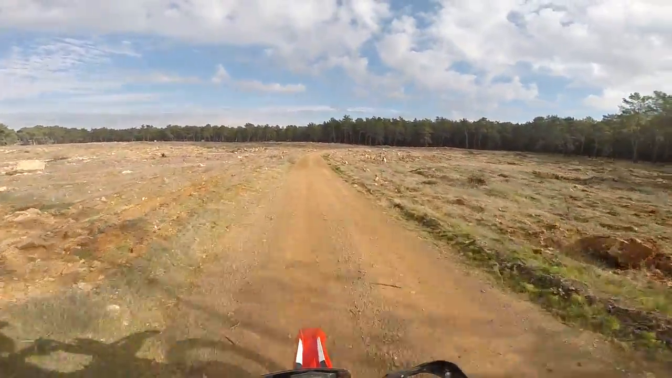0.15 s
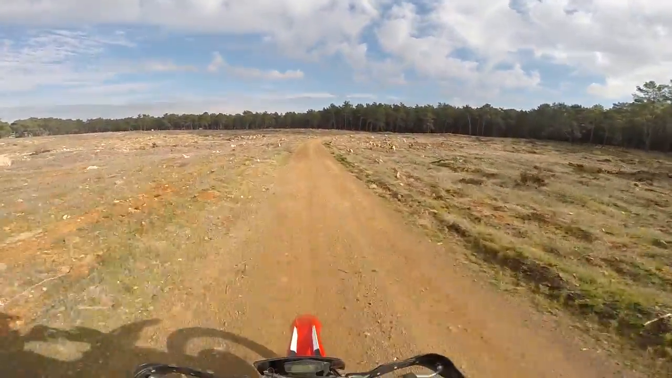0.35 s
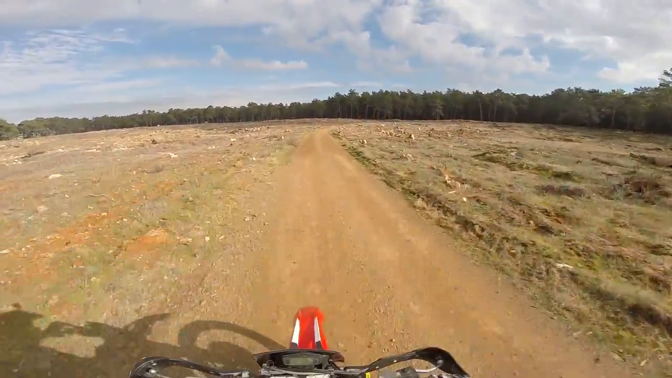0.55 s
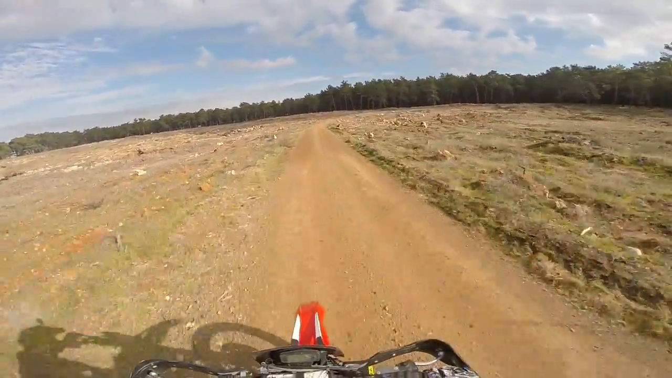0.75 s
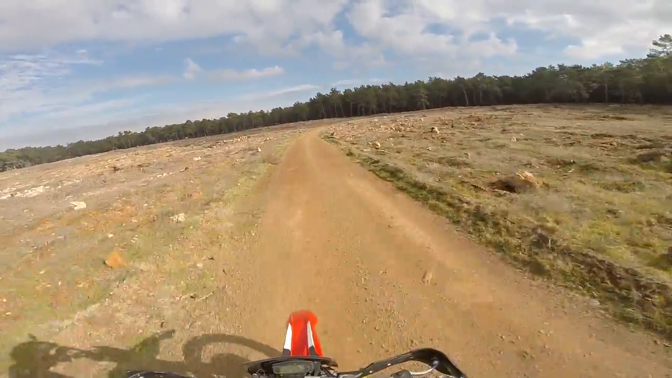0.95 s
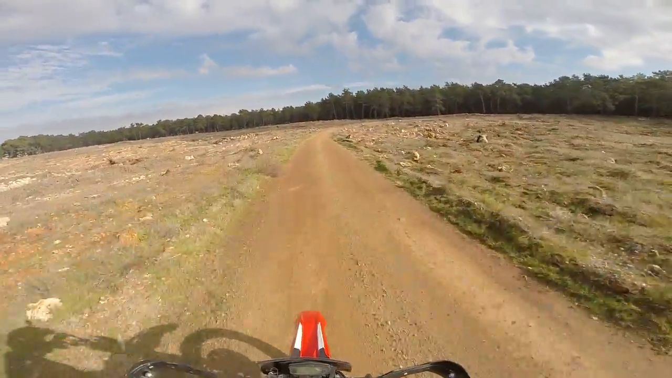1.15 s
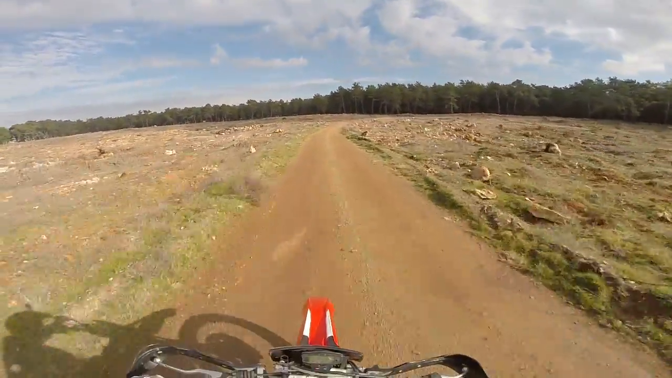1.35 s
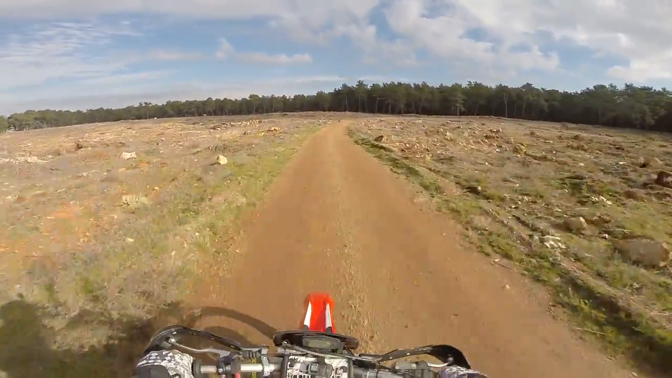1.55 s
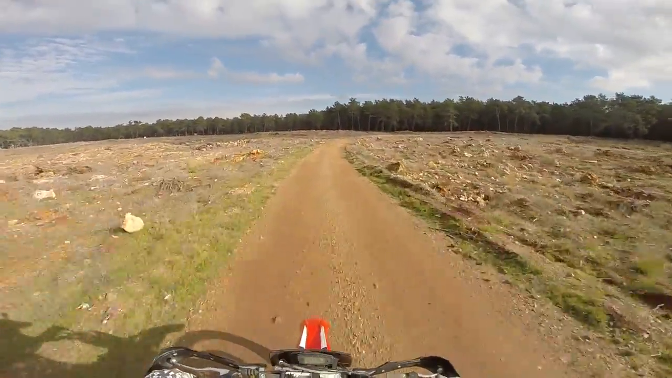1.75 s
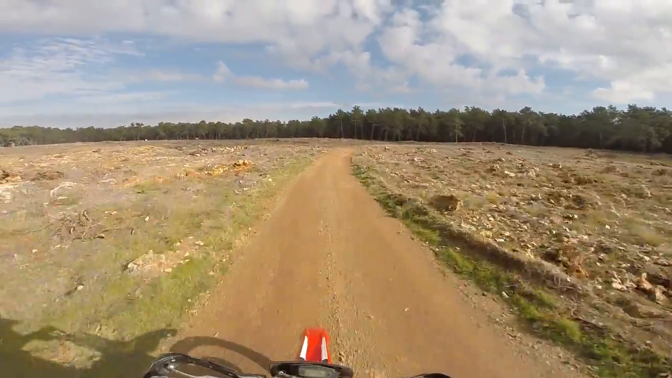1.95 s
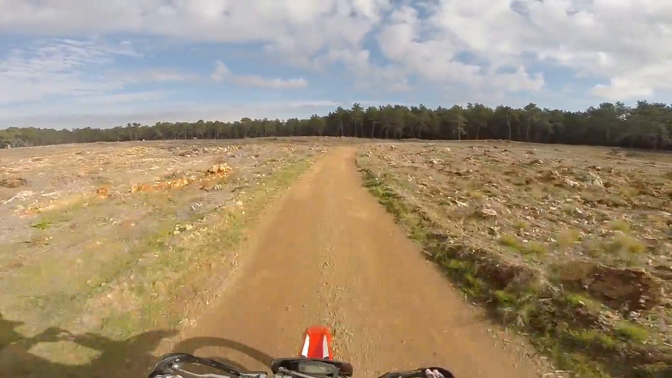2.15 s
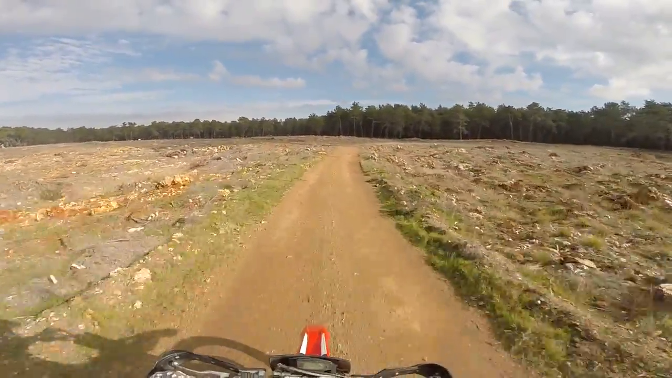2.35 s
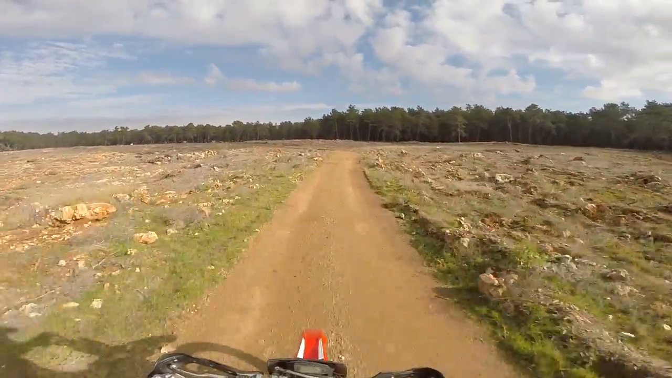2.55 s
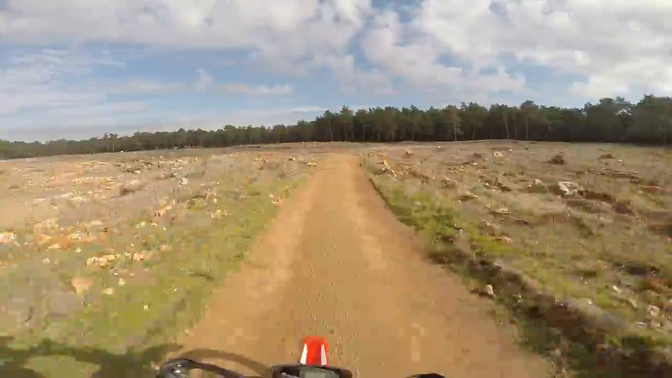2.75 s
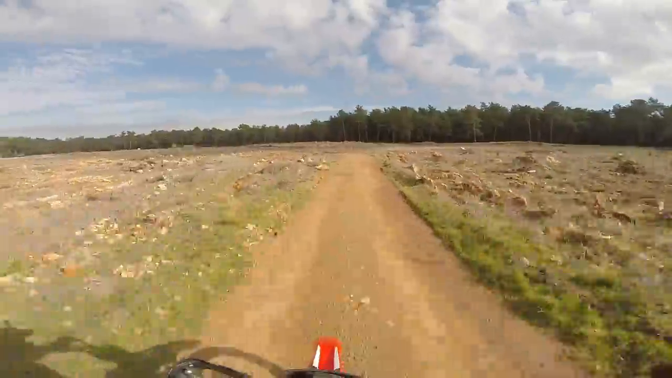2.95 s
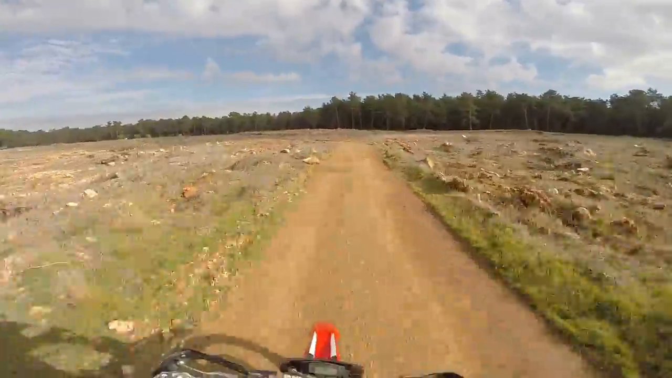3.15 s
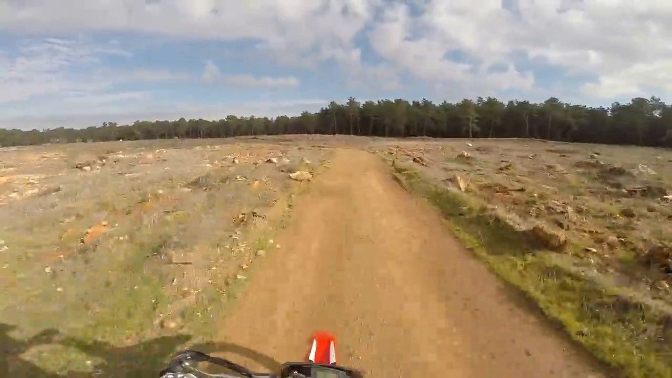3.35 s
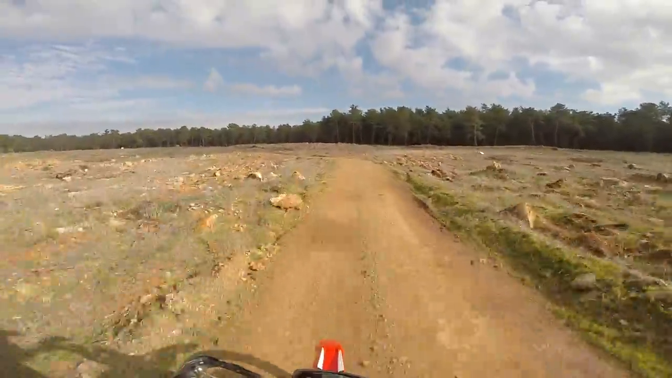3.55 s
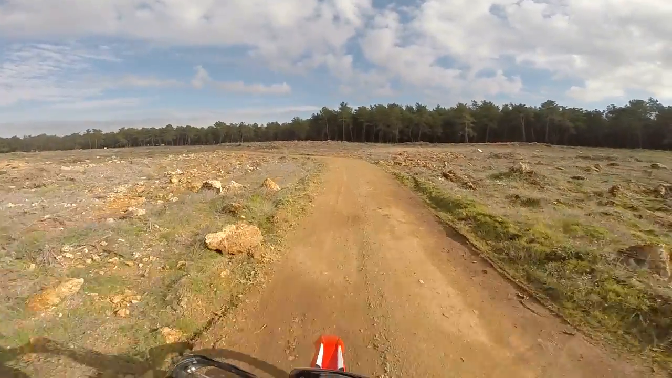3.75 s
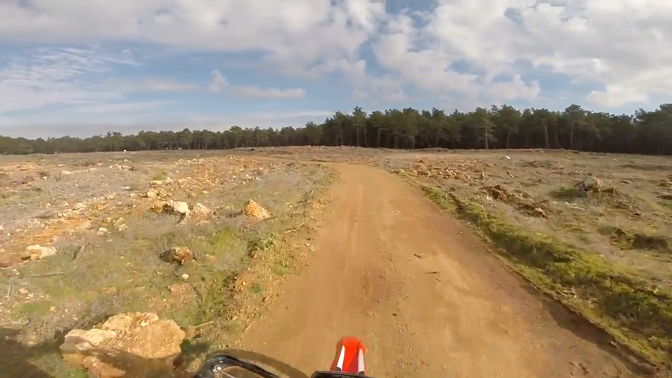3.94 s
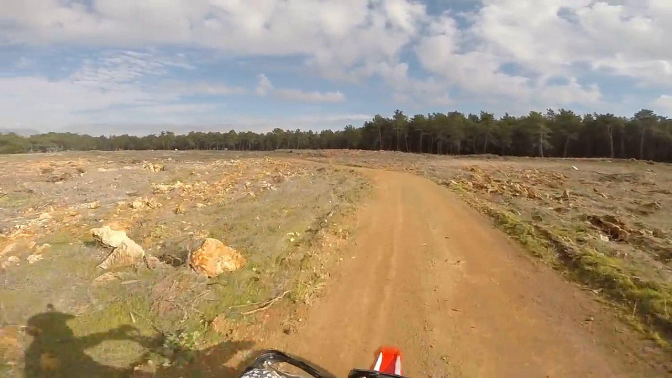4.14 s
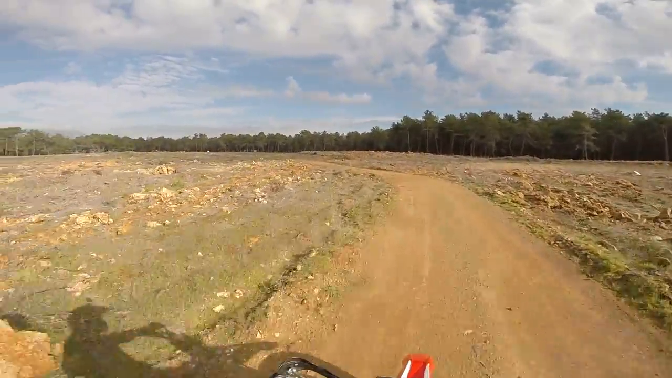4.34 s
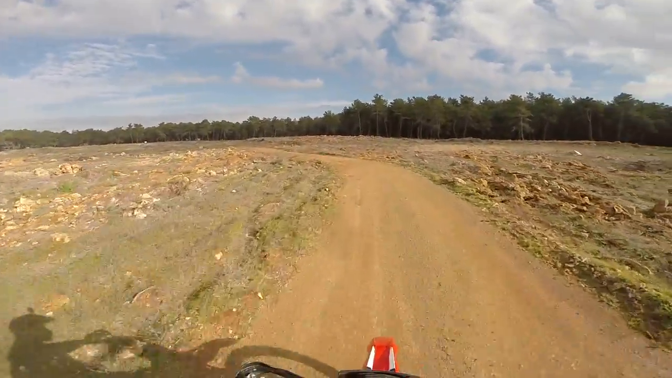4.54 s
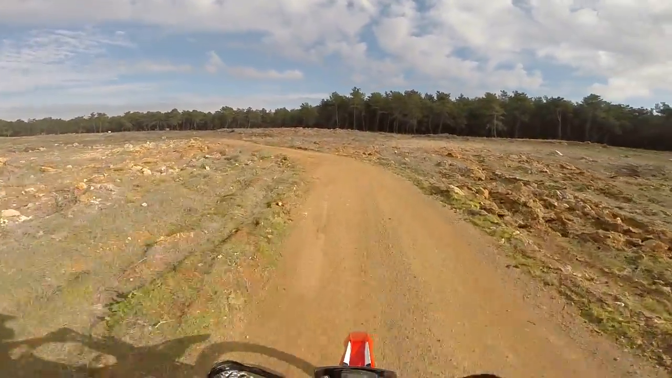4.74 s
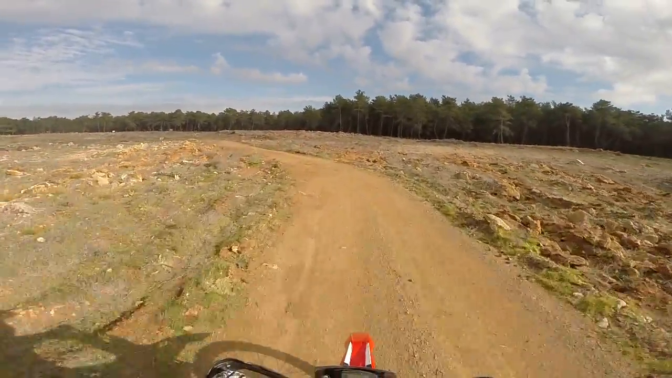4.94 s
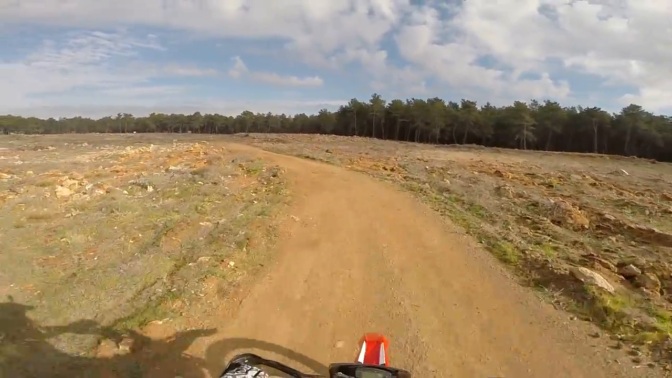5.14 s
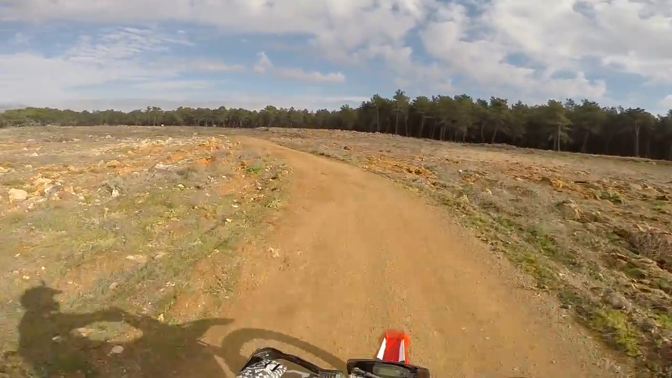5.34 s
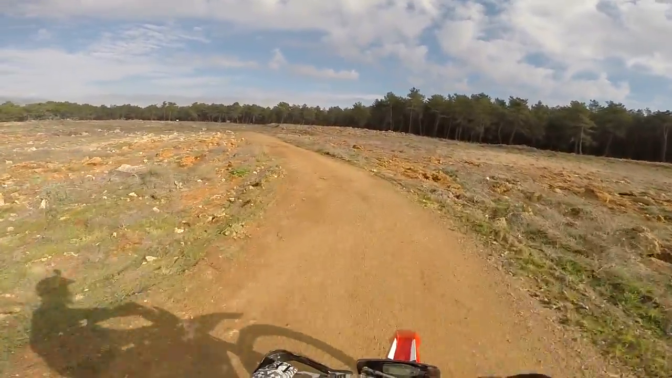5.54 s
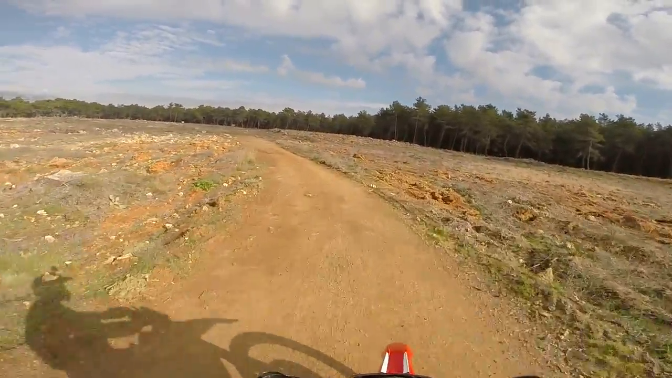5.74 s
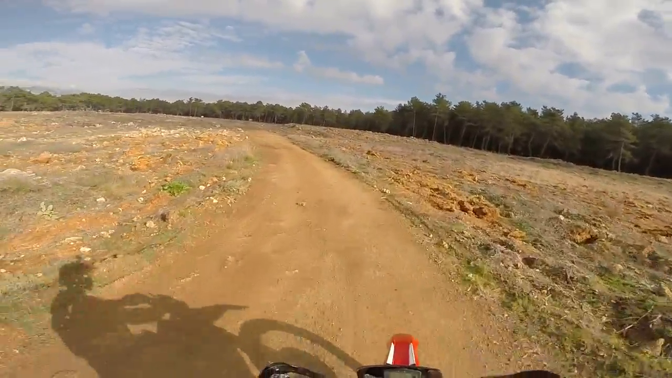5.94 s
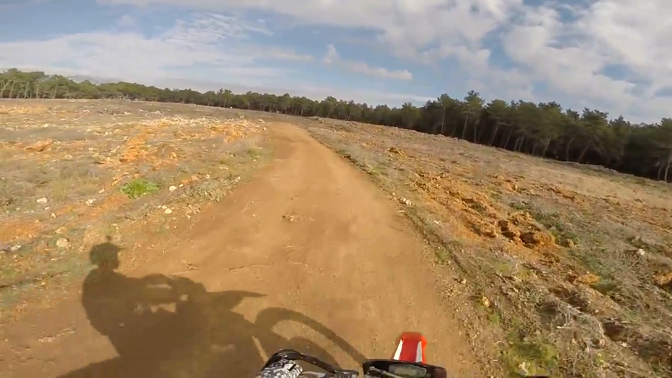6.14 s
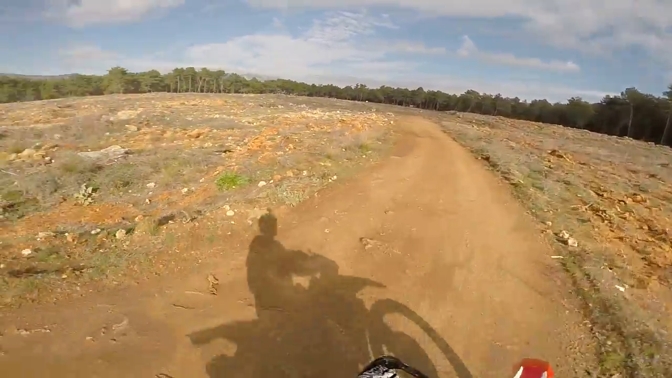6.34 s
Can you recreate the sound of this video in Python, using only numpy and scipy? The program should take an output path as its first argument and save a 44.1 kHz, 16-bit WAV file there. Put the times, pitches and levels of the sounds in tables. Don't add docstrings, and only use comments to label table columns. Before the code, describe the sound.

Wind roars against a helmet microphone on a dirt bike crossing an open trail, a dense midrange rush with fine hiss and unsteady low buffeting. From 0 to 1.5 seconds a low, throaty engine growl climbs in pitch beneath it. At 0.5 a hard grain cracks sharply on the case and the level briefly dips, then recovers; the wind is strongest around 1.4. A soft knock comes near 1.7 as the engine gives way to a coasting hum that slides steadily lower. Tiny shrill whistles flicker from 2.3 to 2.9, with a booming shake near 3.0. A rough buzz rises and drops between 3.2 and 3.8. Deep, soft jolts thud from 3.7 to 4.4. The wind then thins markedly, leaving the low hum and faint rattles more exposed, with tiny high metallic chain chirps from 6.0 to 6.4.

```python
import sys
import numpy as np
from scipy import signal
from scipy.fft import rfft, irfft, next_fast_len
from scipy.io import wavfile
from scipy.ndimage import uniform_filter1d

SR = 44100
rng = np.random.default_rng(int(sys.argv[2]) if len(sys.argv) > 2 else 0)


def log_audio(samples):
    frames = np.atleast_2d(samples).T
    limited = np.clip(frames, -1, 1)
    pcm = np.round(limited * 32767).astype(np.int16)
    wavfile.write(sys.argv[1], SR, pcm)


def boost(x):
    u = np.asarray(x, float) / 20
    return 10 ** u


N = 286204

# start_s, flow_db, turn_db (head turn: plus feeds the lower resonances, minus the upper)
AIRFLOW = [(0, -24.5, -1), (.16, -22, -4.5), (.45, -19.5, 0.5), (.9, -21.5, -0.5), (1.41, -17.5, -3),
           (1.66, -22, -3), (2.16, -21, -8), (2.72, -20, -5), (3.02, -24, -8), (3.2, -22, -2.5),
           (3.7, -25, -5.5), (4.22, -26.5, -11.5), (4.55, -28, -6), (4.67, -29, -9), (4.92, -34.5, -7.5),
           (5.19, -33.5, -4.5), (5.87, -37, 2.5), (6.49, -44, 5)]


def rms_one(x):
    return x / np.sqrt(np.mean(x ** 2) + 1e-20)


def in_time(rows):
    s, *columns = np.transpose(rows)
    return [np.interp(np.arange(N) / SR, s, c) for c in columns]


def swells(rows):
    t = np.arange(N) / SR
    return sum(db * np.exp(-((t - s) / half_s) ** 2) for s, half_s, db in rows)


def follow(mean_db, db_per_db):
    flow_db = in_time(AIRFLOW)[0]
    mean_flow_db = -25
    return mean_db + db_per_db * (flow_db - mean_flow_db)


def drift(rate_hz):
    r = np.exp(-40 * np.pi * rate_hz / SR)
    noise = rng.standard_normal(N // 20 + 2002)
    slow = signal.lfilter([1], [1, -2 * r, r * r], noise)[2000:]
    return np.interp(np.arange(N) / 20, np.arange(len(slow)), rms_one(slow))


def resonate(x, hz, width_hz):
    r = np.exp(-np.pi * width_hz / SR)
    zeros = [(1 - r * r) / 2, 0, (r * r - 1) / 2]
    poles = [1, -2 * r * np.cos(2 * np.pi * hz / SR), r * r]
    return signal.lfilter(zeros, poles, x)


def coloured(spectrum, slope_db):
    size = next_fast_len(N)
    octave = np.log2(np.arange(size // 2 + 1) * SR / size + 1)
    hz, db = np.transpose(spectrum)
    at = np.log2(hz)
    outside = np.maximum(at[0] - octave, 0) + np.maximum(octave - at[-1], 0)
    gain = boost(np.interp(octave, at, db) - slope_db * outside)
    return rms_one(irfft(rfft(rng.standard_normal(size)) * gain, size)[:N])


def window(start_s, stop_s, fade_s):
    t = np.arange(N) / SR
    return np.clip(np.minimum(t - start_s, stop_s - t) / fade_s, 0, 1)


def tone(rows, fade_s, wobble):
    hz, db = in_time(rows)
    turns = np.cumsum(hz * (1 + wobble * drift(50.5))) / SR
    return window(rows[0][0], rows[-1][0], fade_s) * boost(db + 3.5) * np.sin(2 * np.pi * turns)


def stack(speed, level, orders, fade_s, breath_db):
    (rate,), (db,) = in_time(speed), in_time(level)
    angle = 2 * np.pi * np.cumsum(rate) / SR
    lines = 0
    for k, order_db in orders:
        phase = rng.uniform(0, 2 * np.pi)
        lines = lines + boost(order_db + breath_db * drift(5.4)) * np.sin(round(k) * angle + phase)
    return window(speed[0][0] - fade_s, speed[-1][0] + fade_s, fade_s) * boost(db + 3) * lines


def burst(events, column, t60_s):
    out, t = np.zeros(N), np.arange(int(.05 * SR)) / SR
    for row in events:
        at = round(row[0] * SR)
        noise = rng.standard_normal(len(t))
        out[at:at + len(t)] += (boost(row[column] - 60 * t / t60_s) * noise)[:N - at]
    return out


def wind():
    # pitch_hz, width_hz, level_db, lower_share (0-1), brightness_share (0-1)
    housing = [(1541, 229, 1, 0.99, 0), (1750, 480, -5.5, 0.48, 0.08), (2170, 450, -3, 0.67, 0),
               (2486, 196, 0, 0.36, 0), (2692, 207, 1, 0.33, 0), (3253, 290, -4, 0.14, 0.06),
               (3518, 353, 1.5, 0.42, 0.09), (4105, 99, -9, 0.06, 0.5), (4410, 350, -15.5, 0.1, 0.94),
               (5112, 230, -15, 0, 0.26), (5684, 920, -14.5, 0, 0.95), (6300, 360, -26, 0.1, 1)]
    # pitch_hz, level_db (per Hz)
    fine_hiss = [(6500, -6.5), (7500, 2), (8300, -1.5), (8900, -2.5), (9700, -4), (10500, -3),
                 (11500, -10.5), (12600, -19), (13600, -18), (15000, -11)]
    # start_s (centre), half_length_s, turn_db
    nods = [(.33, .04, 2), (3.42, 0.09, -4), (3.98, .08, 2), (4.38, .07, 0), (5.42, .1, 1), (5.74, .07, -1),
            (6.1, 0.054, -10)]
    # start_s (centre), half_length_s, level_db
    lulls = [(.6, .06, -1.5), (1.28, .06, -1), (3.6, .08, -0.5), (3.98, 0.027, -3.5), (4.38, 0.2, -2.5),
             (5.74, 0.082, -1), (6.37, .08, 0.5)]
    # start_s (centre), half_length_s, level_db
    gusts = [(1.15, 0.16, 0), (2.95, 0.22, 4), (3.62, 0.16, 3.5), (4.42, 0.19, 3)]
    flow_db, turn_db = in_time(AIRFLOW)
    flow_db, turn_db = flow_db + swells(lulls), turn_db + swells(nods)
    upper_db, lower_db = flow_db - turn_db / 2, flow_db + turn_db / 2
    fine_db = follow(mean_db=-45, db_per_db=1.275) + swells(gusts)
    gust, flutter = drift(11.5), drift(150)
    lower_tilt_db = lower_db - upper_db + 3
    brightness_db = fine_db - upper_db + 22
    roar = 0
    for hz, width_hz, db, low, bright in housing:
        eddies = rng.standard_normal(N)
        for _ in range(2):
            eddies = resonate(eddies, hz, 1.295 * width_hz)
        eddy_db = db + low * lower_tilt_db + bright * brightness_db + 0.57 * drift(10.5)
        roar = roar + boost(eddy_db) * eddies
    roar = boost(upper_db + 13.5 + 0.62 * gust + 0.6 * flutter) * roar
    hiss_db = fine_db + 0.17 * gust + 0.53 * flutter + 0.72 * drift(24)
    return roar + boost(hiss_db) * coloured(fine_hiss, slope_db=35)


def mount_boom():
    # pitch_hz, width_hz, level_db
    mount = [(172, 21, 1.5), (186.3, 6.8, -1.5)]
    # start_s (centre), half_length_s, level_db
    washboard = [(.12, 0.12, -4.5), (.3, 0.026, 4), (.5, 0.041, 7.5), (1.25, 0.068, -0.5), (1.58, 0.14, 7),
                 (2.3, 0.14, 3), (2.6, 0.048, 6), (2.81, 0.1, 5.5), (3.04, 0.081, 11), (3.65, 0.11, 8),
                 (4.4, 0.33, 0.5)]
    boom_db = follow(mean_db=-32, db_per_db=0.63) + swells(washboard)
    push = resonate(rng.standard_normal(N), 157.5, 61)
    boom = sum(boost(db) * resonate(push, hz, width_hz) for hz, width_hz, db in mount)
    return boost(boom_db + 2.0 + 1.25 * drift(8.2)) * rms_one(boom)


def buffeting():
    # pitch_hz, level_db (per Hz)
    buffet = [(8, -7), (13, -4.5), (24, -6), (42, -7), (58, -10)]
    # start_s (centre), half_length_s, level_db
    rocking = [(0, 0.14, 6), (.55, .15, -4), (1.76, .08, 2), (2.85, .1, 5.5), (4.1, .4, 2),
               (5.35, 0.29, -0.5), (6.4, 0.35, 1.5)]
    buffet_db = follow(mean_db=-35, db_per_db=0.29) + swells(rocking)
    return boost(buffet_db + 0.5) * coloured(buffet, slope_db=8.0)


def ground():
    # pitch_hz, level_db (per Hz)
    rolling = [(45, 3), (75, -7), (130, 11.5), (215, -31), (260, -1), (340, -7), (430, -4), (550, -8.5),
               (800, -5), (1000, -8), (1250, 2), (1400, -15)]
    db = follow(mean_db=-40, db_per_db=0.88)
    return boost(db + 3.0 + 0.67 * drift(17)) * coloured(rolling, slope_db=26)


def engine():
    # start_s, firing_hz
    firing = [(0, 45), (.15, 46.4), (.45, 47.4), (.9, 58.2), (1, 61.7), (1.07, 68.2), (1.25, 73.3),
              (1.45, 76.2), (1.56, 76.6)]
    # start_s, level_db
    firing_db = [(0, -40), (.45, -42), (.7, -39.5), (1.05, -39.5), (1.56, -45.5)]
    # multiple, slow_db, middle_db, fast_db (at the three speeds below)
    harmonics = [(1, -3, -3, -1), (2, 5, 4, 4), (3, 0, 3, 7), (4, -3, -6, -3), (5, -2, -1, -4),
                 (6, -1, -5, 0), (7, -16, -5, -8), (8, -10, -1, -6), (9, -11, -6, -6), (10, -11, -10, -7),
                 (11, -10, -10, -4), (12, -17, -12, -8), (13, -12, -4, -13), (14, -12, -9, -12),
                 (17, -8, -14, -16)]
    speeds = (46, 56, 74)
    rate, = in_time(firing)
    pulling = [(k, np.interp(rate, speeds, db)) for k, *db in harmonics]
    return stack(firing, firing_db, pulling, fade_s=0.019, breath_db=0.6)


def grit():
    # start_s, crack_db, tick_db, knock_db
    grains = [
        (.282, -45, -15, -40),
        (0.5136, 11, -4, -3),
        (1.2522, -45, -13, -40),
        (1.592, -36, -15, -40),
        (1.6748, -19, -19, -3.5),
    ]
    crack = burst(grains, column=1, t60_s=0.0059)
    bright = signal.sosfilt(signal.butter(2, [4900, 11000], "band", fs=SR, output="sos"), crack)
    ring = 1.6 * resonate(crack, 8900, 250)
    tick = burst(grains, column=2, t60_s=0.0029)
    tick = signal.sosfilt(signal.butter(2, 9000, "high", fs=SR, output="sos"), tick)
    knock = np.zeros(N)
    for start_s, _, _, knock_db in grains:
        knock[round(start_s * SR)] = boost(knock_db + 22.0)
    knock = signal.sosfilt(signal.butter(2, 3500, fs=SR, output="sos"), knock)
    dull = -.8 * resonate(knock, 750, 320) - 1.5 * resonate(knock, 1580, 350)
    dull += 2.5 * resonate(knock, 2660, 400) - 0.44 * resonate(knock, 2900, 400)
    return bright + ring + tick + dull


def ruts():
    # start_s, sway_db, shudder_db
    jolts = [(.36, -28, -30), (1.2, -33, -18), (1.72, -16.5, -21), (2.8, -31, -22), (3.03, -23, -34),
             (3.7, -20, -14), (3.88, -11.5, -24), (4.048, -13.5, -8), (4.351, -14.5, -24), (5.67, -27, -15),
             (6.28, -31, -36)]
    out = np.zeros(N)
    for s, sway_db, shudder_db in jolts:
        t = np.maximum(np.arange(N) / SR - s, 0)
        sway = (t / 0.11) * np.exp(1 - t / 0.056) * np.sin(2 * np.pi * 14 * t)
        shudder = (t / 0.077) * np.exp(1 - t / 0.019) * np.sin(2 * np.pi * 42 * t)
        out += boost(sway_db) * sway + boost(shudder_db) * shudder
    return out


def drive_line():
    # start_s, turning_hz
    coast = [(1.7, 59), (2.9, 50), (3.5, 44), (4.6, 34), (5.5, 28.2), (6.49, 21.8)]
    # start_s, level_db
    coast_db = [(1.7, -50), (2.9, -43), (3.6, -42), (4.6, -46), (5.5, -45.5), (6.49, -48)]
    # multiple, level_db, swell_share (of the late swell, negative falls)
    shaft_orders = [(2, 4.5, -.3), (3, 2, -.5), (5, -9.5, 0.86), (8, -8, -1), (13, -20, 0.65),
                    (14, -18.5, 0.4), (15, -22, 0.66), (16, -23.5, 0.65), (17, -37, 0.8)]
    swell_db = np.interp(np.arange(N) / SR, [3.6, 5.7], [0, 12])
    coasting = [(k, db + share * swell_db) for k, db, share in shaft_orders]
    return stack(coast, coast_db, coasting, fade_s=0.33, breath_db=1.5)


def rattles():
    # start_s, stop_s, pitch_hz, width_hz, level_db
    parts = [
        (1.87, 3, 600, 15, -48),
        (5.3, 6.6, 610, 17, -61),
        (4.34, 7, 397, 41, -54.5),
        (4.1, 5.9, 650, 79, -58),
        (4.08, 4.62, 9000, 810, -46),
        (3.55, 3.75, 220, 110, -39),
    ]
    out = np.zeros(N)
    for start_s, stop_s, hz, width_hz, db in parts:
        rattle = rms_one(resonate(rng.standard_normal(N), hz, width_hz))
        out += window(start_s, stop_s, 0.26 * (stop_s - start_s)) * boost(db) * rattle
    return out


def whistles():
    # start_s, length_s, pitch_hz, level_db
    edge_tones = [(2.33, .025, 9100, -42), (2.435, .035, 8700, -48), (2.497, .038, 8800, -37),
                  (2.617, .018, 8750, -41), (2.7, .024, 9000, -41), (2.728, .011, 9080, -38),
                  (2.74, 0.079, 8830, -34), (2.796, .03, 7200, -41), (2.823, 0.033, 8650, -31),
                  (2.866, .017, 8580, -31), (2.88, .05, 7110, -38)]
    peak_share, edge_db, sag_hz = 0.44, -2, 90
    shrill = 0
    for s, length_s, hz, db in edge_tones:
        path = [(s, hz, db + edge_db),
                (s + peak_share * length_s, hz + sag_hz / 2, db),
                (s + length_s, hz - sag_hz / 2, db + edge_db)]
        shrill = shrill + tone(path, fade_s=0.0027, wobble=0.011)
    return boost(2.6 * drift(90)) * shrill


def buzz():
    start_s, top_s, end_s = 3.2, 3.505, 3.79
    top_hz, climb_hz_per_s, fall_hz_per_s = 259, 84, 580
    top_db, swell_db_per_s, late_db_per_s = -31, 15, 22
    boost_hz, boost_half_width_hz, boost_db = 167, 24, 12.5
    s = np.arange(start_s, end_s, .005)
    before, after = np.maximum(top_s - s, 0), np.maximum(s - top_s, 0)
    hz = top_hz - climb_hz_per_s * before - fall_hz_per_s * after
    db = top_db - swell_db_per_s * before + late_db_per_s * after
    db = db + boost_db * np.exp(-((hz - boost_hz) / boost_half_width_hz) ** 6)
    return boost(0.8 * drift(30)) * tone(np.transpose([s, hz, db]), fade_s=0.032, wobble=0.012)


def chain():
    # start_s, level_db
    chirps = [
        (6.02, -66),
        (6.10, -64),
        (6.155, -55),
        (6.275, -72),
        (6.435, -60),
    ]
    envelope = uniform_filter1d(np.abs(burst(chirps, column=1, t60_s=.2)), size=200)
    scrape = envelope * rng.standard_normal(N)
    return 3.6 * resonate(scrape, 10500, 300) + 1.5 * resonate(scrape, 12000, 500)


def scene():
    air = wind() + mount_boom() + buffeting() + ground()
    bike = engine() + drive_line() + rattles() + buzz() + chain()
    return (air + bike + grit() + ruts() + whistles())[None]


def roll_off(x):
    return signal.sosfilt(signal.butter(12, 16400, fs=SR, output="sos"), x)


def record(dry):
    duck_at_s, duck_db, recover_db_per_s = .4922, -9, 17.5
    since = np.arange(N) / SR - duck_at_s
    onset = np.clip(since / 0.0048, 0, 1)
    ducked = dry * boost(onset * np.minimum(duck_db + recover_db_per_s * since, 0))
    rounded = 1.3 * np.tanh(ducked / 1.3)
    cut = signal.sosfilt(signal.cheby2(12, 60, 15300 + 250, fs=SR, output="sos"), rounded)
    return roll_off(cut)


dry = scene()
out = record(dry)
log_audio(out)
```